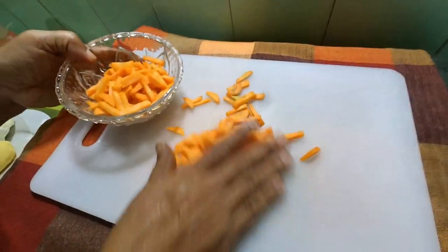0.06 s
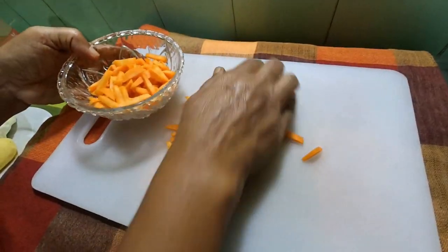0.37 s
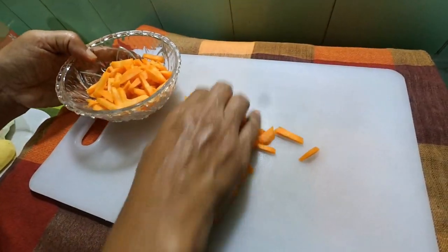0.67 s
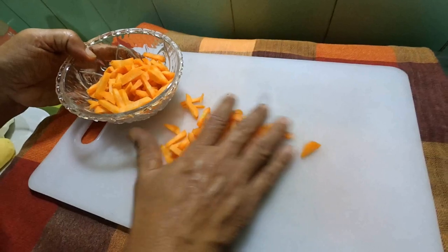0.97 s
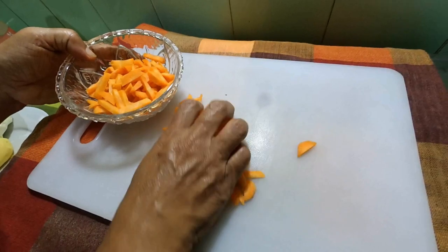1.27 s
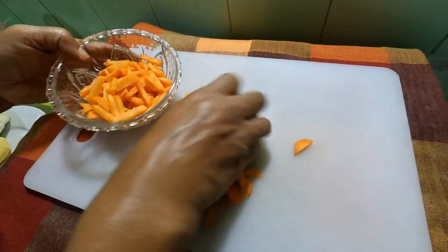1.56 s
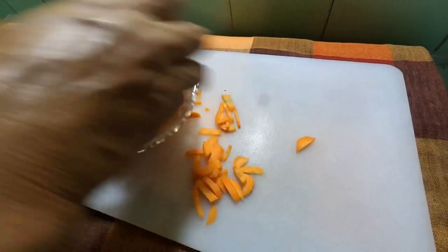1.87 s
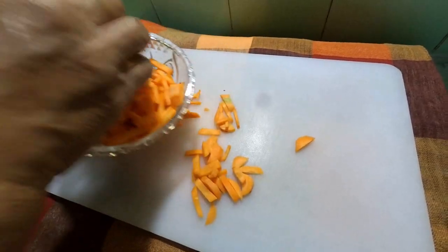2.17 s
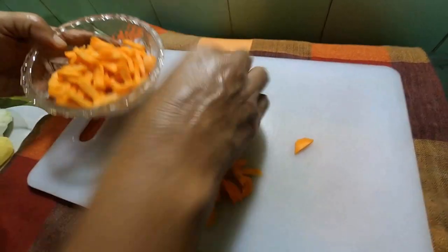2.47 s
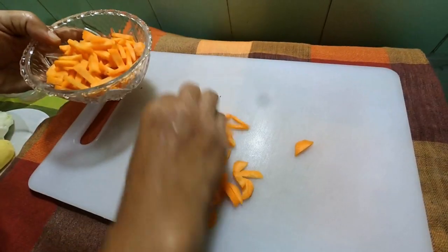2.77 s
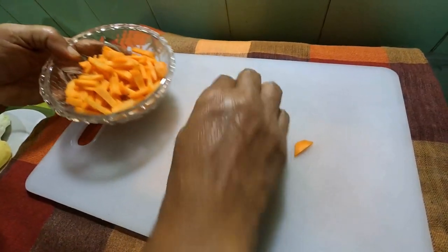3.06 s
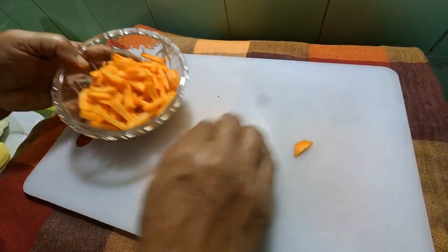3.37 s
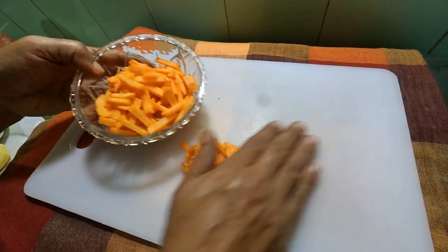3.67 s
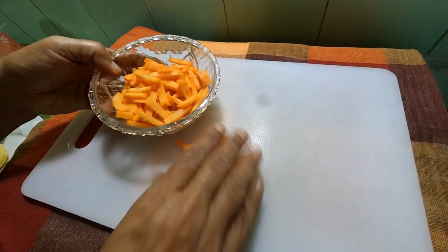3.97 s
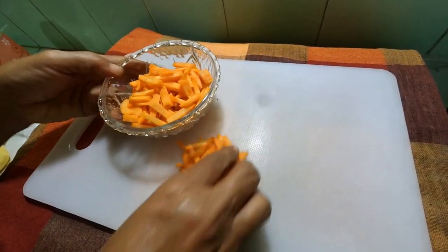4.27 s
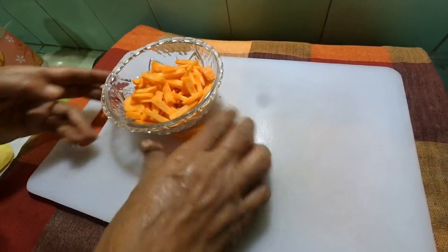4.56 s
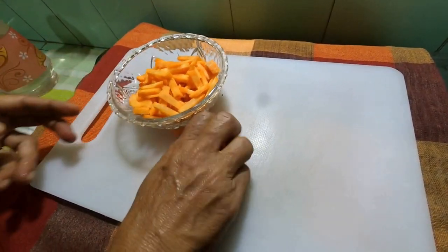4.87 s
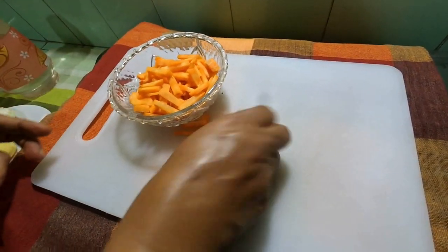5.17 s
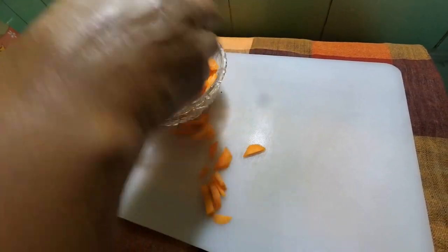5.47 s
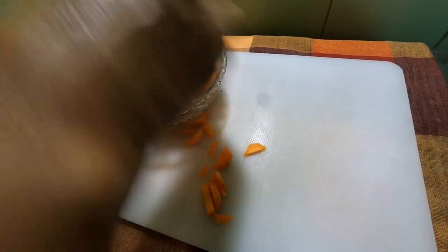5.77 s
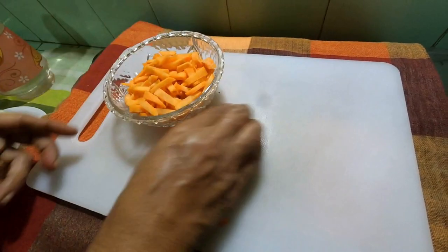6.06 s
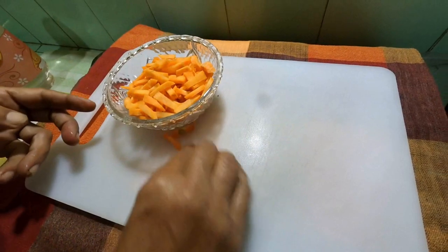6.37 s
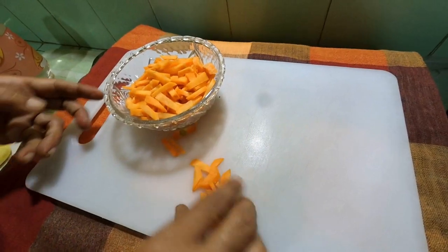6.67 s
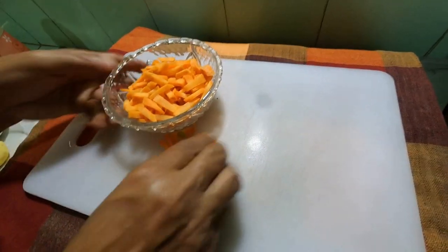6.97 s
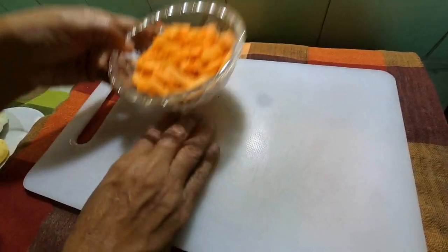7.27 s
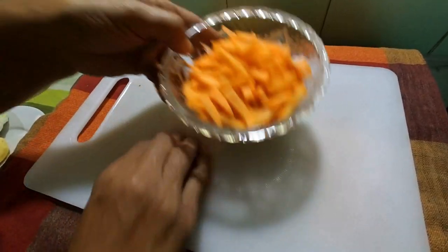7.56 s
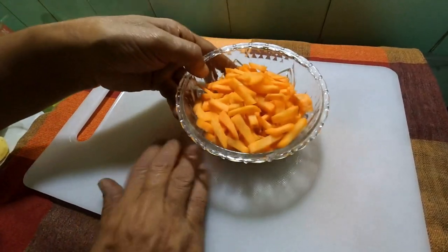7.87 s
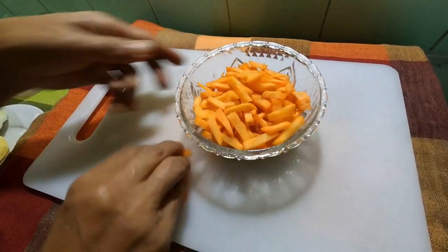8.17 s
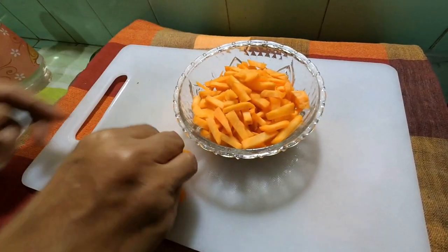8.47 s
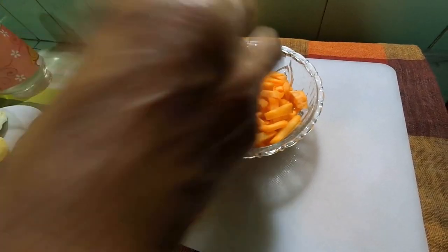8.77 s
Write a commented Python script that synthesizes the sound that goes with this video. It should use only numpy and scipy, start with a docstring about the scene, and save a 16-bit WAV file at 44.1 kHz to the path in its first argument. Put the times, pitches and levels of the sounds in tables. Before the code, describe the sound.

Faint rubbing and tapping of cut carrots gathered on a cutting board, with light glass clinks and one sharp knock from the bowl.

```python
"""A tiled kitchen: a hand sweeps cut carrot sticks together on a plastic board, into a glass bowl.
The palm pats and judders over the board, damp skin hisses, and the arm's weight thuds in the table.
The sticks tumble, tap and click, and the glass rings faintly when touched, over a low room rumble.
Near the end the bowl is set down with one sharp knock and rocks onto its base."""
import sys
import numpy as np
from scipy import signal
from scipy.fft import rfft, irfft, next_fast_len
from scipy.io import wavfile
from scipy.ndimage import uniform_filter1d, map_coordinates

SR = 44100
rng = np.random.default_rng(int(sys.argv[2]) if len(sys.argv) > 2 else 0)


def inscribe(sig):
    """Save sig as 16-bit PCM at rate SR to the path in sys.argv[1].

    A 1-D sig is mono; a 2-D sig holds one channel per row.
    Samples are clipped to [-1, 1] before scaling.
    """
    pcm = np.round(np.clip(np.atleast_2d(sig).T, -1, 1) * 32767)
    wavfile.write(sys.argv[1], SR, pcm.astype(np.int16))


N = 388080  # 8.8 s


def amp(db):
    """Decibels to gain."""
    return 10 ** (np.asarray(db) / 20)


def unit(x):
    """x at rms 1."""
    return x / np.sqrt(np.mean(x ** 2) + 1e-20)


def along(points, hz):
    """Read a curve of (freq_hz, value) points on a log frequency axis."""
    freqs, values = np.transpose(points)
    return np.interp(np.log(hz + 1), np.log(freqs + 1), values)


def wobble(rate):
    """A smooth random curve, rate knots a second."""
    coarse = np.linspace(0, N, num=N // 64)
    curve = map_coordinates(rng.standard_normal(int(N * rate / SR) + 4), [coarse * rate / SR])
    return np.interp(np.arange(N), coarse, curve)


def filtered(x, response):
    """EQ x with a gain that is a function of frequency."""
    size = next_fast_len(N + SR // 2)
    return irfft(rfft(x, size) * response(np.fft.rfftfreq(size, 1 / SR)), size)[..., :N]


def noise(spectrum):
    """Coloured noise of rms 1."""
    return unit(filtered(rng.standard_normal(N), lambda hz: amp(along(spectrum, hz))))


def add(track, start_s, sound):
    """Mix a sound into the track."""
    rest = track[round(start_s * SR):]
    rest[:len(sound)] += sound[:len(rest)]


def contact(spectrum, tilt_db_per_octave=0, size=8192):
    """One contact: a minimum-phase pulse of peak 1 with the given spectrum, tilted."""
    hz = np.fft.rfftfreq(size, 1 / SR)
    octave = np.log2(np.clip(hz, 100, 8000) / 100)
    cepstrum = irfft(np.log(amp(along(spectrum, hz) + tilt_db_per_octave * octave)))
    fold = 1 + np.sign(size // 2 - np.arange(size))  # moves the energy to the front
    fold[0] = 1
    pulse = irfft(np.exp(rfft(cepstrum * fold)))
    return pulse / np.abs(pulse).max()


def roughen(pulse, corner_hz, spread_s):
    """Surfaces meet at many tiny points, which spreads the treble of a blow over a few milliseconds."""
    t = np.arange(len(pulse)) / SR
    grit = rfft(rng.standard_normal(len(t)) * np.exp(-t / spread_s))
    grit = irfft(grit / np.abs(grit) ** .7) * np.exp(-t / spread_s / 4)  # partly whitened
    low, high = [signal.sosfilt(signal.butter(2, corner_hz, kind, fs=SR, output="sos"), pulse)
                 for kind in ("low", "high")]
    rough = low + signal.fftconvolve(high, grit / np.linalg.norm(grit))[:len(t)]
    return rough / np.abs(rough).max()


def ring(modes, colour, scatter_db, attack_s):
    """Decaying modes, weighted by the colour of the touch, at new strengths for every blow."""
    t = np.arange(int(SR * max(t60 for _, _, t60 in modes))) / SR
    tone = np.zeros(len(t))
    for hz, db, t60 in modes:
        struck_db = db + along(colour, hz) + scatter_db * rng.standard_normal()
        tone += amp(struck_db - 60 * t / t60) * np.sin(2 * np.pi * (hz * t + rng.random()))
    return (1 - np.exp(-t / attack_s)) * tone


def stereo(mid, side, width):
    """Left and right from mid and side, the side shaped by a width curve."""
    side = filtered(side, lambda hz: amp(along(width, hz)))
    return np.array([mid + side, mid - side])


# The two beds of the room tone: freq_hz, level_db
RUMBLE_SPECTRUM = [(12, -27), (20, 2.5), (29, 5), (42, -19), (64, -1.5), (85, -10), (115, -10),
                   (160, -12.5), (240, -21), (330, -26.5), (500, -29.5), (900, -55.5)]
HISS_SPECTRUM = [(200, -46), (500, 3.5), (800, 10.5), (1200, 6), (2000, 1.5), (3500, -1), (7000, 0),
                 (10000, -3.5), (15000, -16.5)]
# Their stereo width: freq_hz, side_gain_db
ROOM_TONE_WIDTH = [(30, -23), (130, -21), (300, -14), (600, -17), (1000, -14), (3000, -11), (12000, -11)]

def room_tone():
    """A low, uneven rumble under a soft hiss."""
    swell = amp(-56 + 2.2 * wobble(8.2))
    rumble = stereo(noise(RUMBLE_SPECTRUM), noise(RUMBLE_SPECTRUM), ROOM_TONE_WIDTH)
    hiss = stereo(noise(HISS_SPECTRUM), noise(HISS_SPECTRUM), ROOM_TONE_WIDTH)
    return swell * rumble + amp(-70) * hiss


# Decay of the tiled room: freq_hz, t60_s
KITCHEN_DECAY = [(60, 0.62), (250, 0.64), (1000, 0.49), (3000, 0.53), (10000, 0.36)]
# Width of the reflections, greatest in the treble: freq_hz, side_gain_db
KITCHEN_WIDTH = [(30, -25), (300, -30), (500, -23), (1000, -23), (2000, -13), (4000, -9.5), (12000, -10)]

def kitchen(x, wet_db):
    """Dry sound in the centre; the table top's quick echo and the room's tail spread around it."""
    hz, t, bands = signal.stft(rng.standard_normal((2, SR * 3 // 4)), SR, nperseg=256)
    build_up = 1 - np.exp(-t / 0.0034)
    decay = amp(-60 * t / along(KITCHEN_DECAY, hz)[:, None])
    tail = signal.istft(bands * build_up * decay, SR, nperseg=256)[1]
    tail *= amp(wet_db) / np.linalg.norm(tail[0])
    echo = rng.standard_normal(tail.shape[1]) * np.exp(-np.arange(tail.shape[1]) / SR / 0.0013)
    around = amp(-6) * tail[1] + amp(-7.5) * echo / np.linalg.norm(echo)
    mid, side = signal.fftconvolve(x[None], np.array([tail[0], around]), axes=1)[:, :N]
    return stereo(x + mid, side, KITCHEN_WIDTH)


# The table's low thump: freq_hz, level_db
THUD_SPECTRUM = [(15, -23), (28, -0.5), (42, -13.5), (66, -0.5), (110, -15.5), (220, -37.5), (1000, -54.5),
                 (15000, -125)]
# The table thuds under the arm's weight and under the bowl's knocks: start_s, level_db
TABLE_THUDS = [(0.11, -40.5), (1.105, -36), (1.403, -40), (2.681, -45), (3.226, -40.5), (3.26, -43.5),
               (3.519, -35), (3.845, -41.5), (4.679, -42.5), (7.456, -43.5), (7.8127, -34), (8.004, -41)]

def table_thuds():
    """Weight on the board makes the table under it thud."""
    track = np.zeros(N)
    for start_s, db in TABLE_THUDS:
        add(track, start_s, -amp(db) * contact(THUD_SPECTRUM, tilt_db_per_octave=3))
    return kitchen(track, wet_db=-5.5)


# Ring of the filled glass bowl: pitch_hz, level_db, t60_s
GLASS_MODES = [(1295, 8.5, 0.12), (1320, -4, 0.35), (2450, -9, 0.044), (2915, 1, 0.21), (2991, -5, 0.48),
               (5174, 3.5, 0.1), (8050, 0, 0.08)]
# Brushes against the rim: start_s, level_db, favoured_hz, decay_ratio
RIM_CLINKS = [(2.094, -57, 2680, .45), (2.1122, -54.5, 3450, 0.61), (2.171, -69, 4400, .6),
              (2.205, -68, 2900, 0.44), (5.655, -66, 2500, .5), (5.688, -65, 2000, .5),
              (5.707, -55, 2560, 1.1), (5.756, -61, 1610, 1.1), (6.097, -55.5, 5100, 0.94),
              (6.106, -61, 1700, 1.2), (6.176, -65, 3800, 1.3), (8.714, -66, 1700, 0.68),
              (8.734, -60, 4300, .8), (8.763, -59, 3600, 0.83)]

def rim_clinks(fall_db_per_octave=13.5):
    """Light touches ring the glass, damped by carrots and hand; the spot sets which modes speak."""
    track = np.zeros(N)
    for start_s, db, favoured_hz, decay_ratio in RIM_CLINKS:
        modes = [(hz, level, t60 * decay_ratio) for hz, level, t60 in GLASS_MODES]
        colour = [(hz, db - fall_db_per_octave * abs(np.log2(hz / favoured_hz))) for hz, _, _ in modes]
        add(track, start_s, ring(modes, colour, scatter_db=1.5, attack_s=0.00063))
    return kitchen(track, wet_db=-8)


# Firm sticks meet each other and the glass: start_s, level_db, pitch_hz, fall_db_per_octave
STICK_CLICKS = [(0.225, -43, 1230, 31), (0.7597, -45.5, 1690, 28), (1.0815, -39, 1280, 28),
                (1.267, -46, 1650, 24), (1.42, -44, 1850, 32), (1.496, -41, 1450, 17),
                (1.513, -42, 1400, 25), (1.521, -43, 1500, 33), (1.8236, -46, 1700, 15),
                (2.112, -46.5, 2140, 18), (2.237, -51, 2350, 19), (3.048, -50.5, 2430, 40),
                (3.5217, -48, 4130, 26), (4.034, -47, 1200, 20), (4.246, -52, 1900, 12),
                (4.288, -49, 1700, 22), (4.525, -55, 1400, 14), (4.841, -53, 2600, 11),
                (4.94, -46, 5850, 24), (5.063, -44.5, 2700, 9), (5.069, -48, 5800, 16),
                (5.487, -49, 5900, 20), (5.5697, -51, 5050, 23), (6.099, -47, 4600, 11),
                (6.9666, -48, 2480, 38), (8.238, -46, 2580, 14), (8.387, -44, 7400, 11),
                (8.728, -46, 1820, 15)]

def stick_clicks(skirt_db=-23):
    """Tiny, dry clicks: a peak over a broad skirt, more clearly pitched the steeper its flanks fall."""
    track = np.zeros(N)
    octaves = np.linspace(-3, 3, num=25)
    for start_s, db, pitch_hz, fall in STICK_CLICKS:
        flanks_db = np.maximum(-fall * abs(octaves), skirt_db - 5 * abs(octaves))
        pulse = contact(np.transpose([pitch_hz * 2 ** octaves, flanks_db]), size=2048)
        add(track, start_s, amp(db) * roughen(pulse, corner_hz=816, spread_s=0.0027))
    return kitchen(track, wet_db=-10.5)


# The tick of a stick landing: freq_hz, level_db
TAP_SPECTRUM = [(60, -19), (330, -5.5), (580, -5), (1080, 8.5), (1600, -3.5), (3000, -13), (7000, -20.5),
                (15000, -49)]
# The board's quick rattle under it: pitch_hz, level_db, t60_s
RATTLE_MODES = [(328, -9.5, 0.051), (597, -2, 0.022), (850, -11.5, 0.014), (1050, -2, 0.012),
                (1584, -19.5, 0.035), (1990, -6, 0.0072)]
# Sticks and fingertips hit the board: start_s, level_db, tilt_db_per_octave
STICK_TAPS = [(0.2251, -40, -2.5), (0.612, -56, 11), (0.7596, -41.5, -2), (0.856, -54, -2),
              (0.9, -45.5, -6.5), (0.993, -45, -2), (1.244, -41, 1.5), (1.431, -40, 3), (1.8239, -42, -0.5),
              (2.861, -46, -12.5), (3.3535, -46, -4.5), (3.418, -49, 1.5), (4.033, -44, 1),
              (4.29, -44.5, -7), (4.333, -43, -5.5), (4.748, -46, -3), (4.76, -46.5, 4), (4.786, -47, -11),
              (5.047, -43, -7), (5.2464, -46, -2), (5.473, -32.5, -4), (5.4865, -35.5, -2),
              (5.491, -37, -6.5), (5.5697, -34.5, -1), (6.321, -46.5, -3.5), (6.992, -48.5, -5),
              (7.0903, -44, -8.5), (8.174, -39, -2), (8.239, -39.5, 2.5), (8.411, -44.5, -1),
              (8.5276, -45.5, -7.5)]

def stick_taps():
    """A falling stick ticks and rattles the board."""
    track = np.zeros(N)
    for start_s, db, tilt in STICK_TAPS:
        colour = [(200, -2 * tilt), (3200, 2 * tilt)]
        add(track, start_s, amp(db) * ring(RATTLE_MODES, colour, scatter_db=2, attack_s=.0004))
        tick = roughen(contact(TAP_SPECTRUM, tilt), corner_hz=1230, spread_s=0.0077)
        add(track, start_s, amp(db - 1.5) * tick)
    return kitchen(track, wet_db=-6.5)


# Ring of the plastic board on its tablecloth: pitch_hz, level_db, t60_s
BOARD_MODES = [(178, -11, 0.3), (207.3, -0.5, 0.4), (239.6, 0.5, 0.18), (271, -9, 0.14), (320, 9, 0.12),
               (390.6, -4, 0.34), (435.5, -6.5, 0.26), (474, -0.5, 0.19), (566, 9.5, 0.049), (825, 3, 0.13),
               (1140, -25, 0.092)]

def board_blows(events, spectrum, corner_hz, spread_s):
    """Each heavy blow is a short, damped push plus the board's ring, at a level of its own."""
    track = np.zeros(N)
    colour = [(hz, level / 2) for hz, level in spectrum]
    for start_s, db, tilt, ring_db in events:
        add(track, start_s, -amp(db) * roughen(contact(spectrum, tilt), corner_hz, spread_s))
        add(track, start_s, amp(ring_db) * ring(BOARD_MODES, colour, scatter_db=1.5, attack_s=.002))
    return track


# The hard knock of the glass foot: freq_hz, level_db
FOOT_SPECTRUM = [(40, -15.5), (150, -13.5), (230, -2.5), (300, 3), (410, -11.5), (600, -9.5), (850, -14.5),
                 (1230, -9.5), (1550, -22.5), (2000, -18), (2500, -23.5), (3300, -28.5), (4000, -36),
                 (6000, -41), (8300, -41.5), (15000, -64)]
# The bowl's thick base, damped by the board: pitch_hz, level_db, t60_s
BASE_MODES = [(800, -8.5, 0.25), (894, 7, 0.022), (1038, 0.5, 0.063), (1180, 11, 0.028),
              (1244, -2.5, 0.063), (1360, 6, 0.022), (2040, -17, .035), (2340, -15, 0.045),
              (2560, -22, .05), (2870, -21, 0.04)]
# The foot lands, edge after edge: start_s, level_db, tilt_db_per_octave, board_ring_db
BOWL_KNOCKS = [(7.8136, -15, -0.5, -35.5), (7.8144, -15, 0, -42.5), (7.819, -23.5, -0.5, -48),
               (7.8759, -25, -2.5, -45.5), (8.0005, -36, -1, -51), (8.0053, -22, 0, -44),
               (8.0061, -21.5, 0, -44), (8.0125, -21, -1, -41.5)]

def bowl_knocks(ring_db_per_db=3.3):
    """The bowl lands on the board and rocks; the hardest knocks ring its base far more than the rest."""
    track = board_blows(BOWL_KNOCKS, FOOT_SPECTRUM, corner_hz=1320, spread_s=0.0019)
    hardest_db = max(db for _, db, *_ in BOWL_KNOCKS)
    for start_s, db, *_ in BOWL_KNOCKS:
        base = ring(BASE_MODES, colour=[(1, 0)], scatter_db=2, attack_s=0.00032)  # flat colour
        add(track, start_s, amp(-33.5 + ring_db_per_db * (db - hardest_db)) * base)
    return kitchen(track, wet_db=-10.5)


# The dull slap of the palm: freq_hz, level_db
PALM_SPECTRUM = [(40, -12), (140, -13), (245, 4), (350, -1.5), (450, -2.5), (700, -14), (1200, -20.5),
                 (2200, -36), (5000, -45.5), (8000, -100), (15000, -90)]
# Fingers and palm land in turn: start_s, level_db, tilt_db_per_octave, board_ring_db
PALM_PATS = [(.1125, -20, -0.5, -45.5), (.117, -36, -1.5, -59), (1.109, -35, -6.5, -55),
             (1.4300, -27, -3, -46), (3.5205, -17, 1, -39.5), (3.5252, -30, -2, -49), (4.186, -44, -4, -65),
             (4.204, -39, -7, -60), (4.2875, -36, 2, -52.5), (7.147, -35, -1, -64),
             (7.159, -36.5, 0.5, -52)]

def palm_pats():
    """The soft hand lands on the board and sets it ringing."""
    return kitchen(board_blows(PALM_PATS, PALM_SPECTRUM, corner_hz=1560, spread_s=0.0068), wet_db=-11.5)


# Skin, wet sticks and the bowl's foot drag on the plastic: start_s, end_s, level_db, pitch_hz
BOARD_DRAGS = [(0.041, 0.124, -39, 320), (0.108, 0.217, -54, 210.6), (0.634, 0.806, -56.5, 649),
               (0.68, 0.818, -53.5, 333.6), (1.09, 1.264, -46.5, 204), (1.275, 1.38, -45, 315),
               (1.392, 1.554, -50, 210.2), (2.786, 2.938, -63, 700), (2.83, 2.993, -54, 318),
               (3.279, 3.426, -64, 610), (3.33, 3.408, -56, 318), (3.94, 4.138, -54, 180),
               (4.17, 4.27, -48, 181.6), (4.454, 4.524, -57.5, 614), (6.218, 6.468, -60.5, 564),
               (7.102, 7.2, -50.5, 210), (8.08, 8.279, -54, 216), (8.159, 8.223, -46, 602),
               (8.21, 8.293, -54.5, 839)]

def board_drags(pitch_arch=0.13):
    """Gripping and slipping makes the board drone or faintly squeak, higher while the hand is fast."""
    track = np.zeros(N)
    waver = 1 + 0.0422 * wobble(60)
    for start_s, end_s, db, hz in BOARD_DRAGS:
        t = np.arange(round((end_s - start_s) * SR)) / SR
        fade = np.clip(np.minimum(t, end_s - start_s - t) / 0.037, 0, 1)
        speed = np.sin(np.pi * t / (end_s - start_s))
        pitch_hz = hz * (1 + pitch_arch * (speed - 2 / np.pi)) * waver[round(start_s * SR):][:len(t)]
        add(track, start_s, amp(db) * fade * np.sin(2 * np.pi * np.cumsum(pitch_hz) / SR))
    return track * amp(1.5 * wobble(40))


def friction(spectrum, slips_per_s, spread_db, smooth_db):
    """Random slips of unequal size over a smooth rub, at rms 1."""
    sizes = amp(spread_db * np.minimum(rng.standard_normal(N), 2)) * rng.choice([-1, 1], N)
    slips = unit(sizes * (rng.random(N) < slips_per_s / SR))
    rub = amp(smooth_db) * rng.standard_normal(N)
    return unit(signal.oaconvolve(slips + rub, contact(spectrum))[:N])


# The hiss of skin on plastic: freq_hz, level_db
SKIN_SPECTRUM = [(1000, -21), (2500, 1), (4000, 3), (6000, 1.5), (8200, -0.5), (11000, -5.5),
                 (15000, -15.5)]

def skin_hiss(patch_db=2.6):
    """Hiss of skin on plastic, with brief random louder and softer patches across the treble."""
    rub = friction(SKIN_SPECTRUM, slips_per_s=1200, spread_db=4, smooth_db=4)
    bands = signal.stft(rub, nperseg=256)[2]
    patches = uniform_filter1d(rng.standard_normal(bands.shape), size=7, axis=0)
    patches = uniform_filter1d(patches, size=5, axis=1)
    return unit(signal.istft(bands * amp(patch_db * unit(patches)), nperseg=256)[1][:N])


def wet_ticks(ticks_per_s=110, centre_hz=2900, decay_cycles=1.1, count=2000):
    """Moist sticks catch and let go: a random crackle, each tick too short to have a pitch."""
    track, t = np.zeros(N), np.arange(SR // 200) / SR
    starts_s = np.cumsum(rng.exponential(1 / ticks_per_s, count))
    for start_s, (size, brightness) in zip(starts_s, np.clip(rng.standard_normal((count, 2)), -2, 2)):
        cycles = centre_hz * 2 ** (.7 * brightness) * t
        tick = np.sin(2 * np.pi * cycles) * np.exp(-cycles / decay_cycles)
        add(track, start_s, amp(-4.5 + 5.5 * size) * tick)
    return track


# The clatter of tumbling sticks: freq_hz, level_db
TUMBLE_SPECTRUM = [(250, -17.5), (480, -5), (620, 0.5), (780, -3), (1100, -0.5), (1500, -6.5),
                   (2100, -10.5), (3000, -18.5), (6000, -26), (15000, -65)]

def tumbling_sticks(clicks_per_s=650, low_hz=330, high_hz=2400, decay_cycles=3, count=7000):
    """Sticks jostle under the hand, each contact a short click at its own pitch, over a smooth rub."""
    t = np.arange(SR // 100) / SR
    gap, place, size = rng.random((count, 3)).T
    starts = (np.cumsum(-np.log(1 - gap)) / clicks_per_s * SR).astype(int)
    pitch_hz = low_hz * (high_hz / low_hz) ** place
    strength = pitch_hz * amp(5 * (2 * size - 1))
    cycles = pitch_hz[:, None] * t
    decay = np.exp(-cycles / decay_cycles) * (1 - t / t[-1])
    clicks = strength[:, None] * np.sin(2 * np.pi * cycles) * decay
    train = np.bincount((starts[:, None] + np.arange(len(t))).ravel(), clicks.ravel(), N)[:N]
    clatter = unit(signal.oaconvolve(train, contact(TUMBLE_SPECTRUM))[:N])
    return unit(clatter + amp(0.5) * noise(TUMBLE_SPECTRUM))


# The board juddering under a pressing palm: freq_hz, level_db
JUDDER_SPECTRUM = [(60, -33.5), (150, -8.5), (207, -7.5), (265, -8.5), (295, -4), (323, 2), (365, -8),
                   (450, -9.5), (600, -16.5), (1200, -52)]
# Strokes of the hand: start_s, lift_s, rise_s, level_db, judder_db, hiss_db, treble_db
# Judder and hiss ride on the sticks' level; treble is over their bass, and a cupped hand dulls it.
HAND_STROKES = [(.0, 0.166, 0.084, -50.5, 2, -6.5, 2.5), (0.396, 0.51, 0.016, -81.5, -1, 12, 0),
                (0.515, 0.763, 0.23, -55.5, 4.5, -6.5, -6.5), (1.007, 1.085, 0.04, -52, 0.5, -5, 7.5),
                (1.09, 1.432, 0.079, -55.5, 9.5, -9.5, -2), (1.444, 1.502, 0.037, -50.5, 2, -9.5, -1),
                (1.607, 1.74, 0.033, -71, 14, -21, -6), (2.03, 2.2, 0.021, -74.5, -14, -3, 15),
                (2.44, 2.52, .04, -72, -2, 3.5, 5), (2.699, 2.896, 0.15, -53.5, 5.5, -11.5, -4),
                (3.202, 3.369, 0.18, -56, 3.5, -9.5, -4), (3.623, 3.83, 0.21, -56.5, 2.5, -2.5, 8.5),
                (3.781, 3.964, 0.14, -52, 12.5, -9.5, -3), (4.155, 4.24, 0.04, -61.5, 14.5, -13, -1),
                (4.25, 4.387, 0.036, -62.5, -9, -5, -2), (4.33, 4.527, 0.032, -65, 8.5, -10, -4),
                (4.718, 4.796, 0.059, -50, 9, -17.5, 2), (4.808, 4.944, 0.029, -55, 7, -14.5, 7.5),
                (4.922, 4.943, .015, -61.5, 0, 0, 6), (5.01, 5.075, 0.055, -49.5, 3, -10.5, -3),
                (6.07, 6.245, 0.03, -64, 6, -7, 2), (6.214, 6.405, 0.12, -57, 2, -11, -6.5),
                (6.734, 6.902, 0.087, -60.5, 8, -4.5, 2.5), (7.1, 7.242, .04, -66, 9.5, -5.5, 9),
                (7.424, 7.61, 0.1, -62, 9, -7, -6), (8.052, 8.251, 0.11, -56, 8.5, -12, -13),
                (8.365, 8.403, 0.031, -65, 16.5, -3, 0), (8.692, 8.73, 0.034, -62, 8, -3.5, -9)]

def stroke_gain(levels_db, lag_s, release_s):
    """Each stroke gathers speed, holds, and dies away once the hand lifts."""
    t = np.arange(N // 32) * 32 / SR
    power = np.zeros(len(t))
    for (start_s, lift_s, rise_s, *_), db in zip(HAND_STROKES, levels_db):
        speed = np.clip((t - lag_s - start_s) / rise_s, 0, 1) ** 1.06
        release = np.exp(-np.maximum(t - lag_s - lift_s, 0) / release_s)
        power += (amp(db) * speed * release) ** 2
    return np.interp(np.arange(N) / SR, t, np.sqrt(power))


def hand_sweeps(crossover_hz=900):
    """Skin touches first and hisses, the sticks roll, then the weight follows and the board judders."""
    *_, level_db, judder_db, hiss_db, treble_db = np.transpose(HAND_STROKES)
    grip_db = 2.77 * wobble(35)  # the hand catches and lets go
    judder_gain = stroke_gain(level_db + judder_db, lag_s=0.0037, release_s=0.064)
    judder = friction(JUDDER_SPECTRUM, slips_per_s=450, spread_db=0, smooth_db=-4)
    judder *= judder_gain * amp(0.64 * grip_db - 4.5)
    sticks = tumbling_sticks()
    bass = filtered(sticks, lambda hz: 1 / (1 + (hz / crossover_hz) ** 4))
    bass_gain = stroke_gain(level_db - treble_db / 2, lag_s=0, release_s=0.034)
    treble_gain = stroke_gain(level_db + treble_db / 2, lag_s=0, release_s=0.034)
    tumble = amp(0.75 * grip_db - 2) * (bass_gain * bass + treble_gain * (sticks - bass))
    crackle = treble_gain * wet_ticks()
    hiss_gain = stroke_gain(level_db + hiss_db, lag_s=-0.0083, release_s=0.039)
    hiss = hiss_gain * amp(0.89 * grip_db - 1.5) * skin_hiss()
    return kitchen(judder + tumble + crackle + hiss + board_drags(), wet_db=-8)


def scene():
    """Hand, sticks, board and bowl, close up over the room tone."""
    on_board = hand_sweeps() + palm_pats() + bowl_knocks() + stick_taps() + stick_clicks()
    return on_board + table_thuds() + rim_clinks() + room_tone()


# Constant shift of the left and right channel: offset_of_full_scale
DC_OFFSET = [
    [.0003],
    [-.0032],
]

def record(dry):
    """A hard high cut at 15.3 kHz, with each channel resting slightly off zero."""
    return filtered(dry, lambda hz: hz < 15300) + DC_OFFSET


dry = scene()
out = record(dry)
inscribe(out)
```